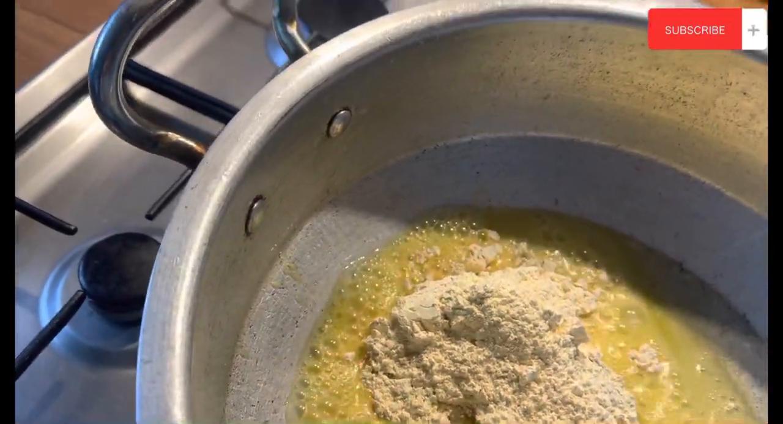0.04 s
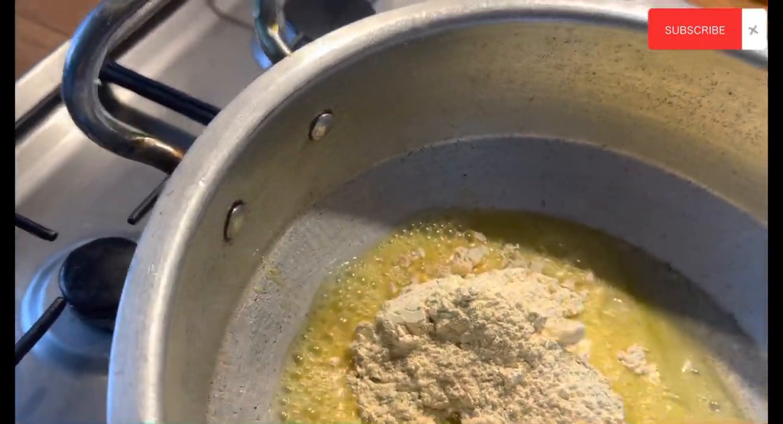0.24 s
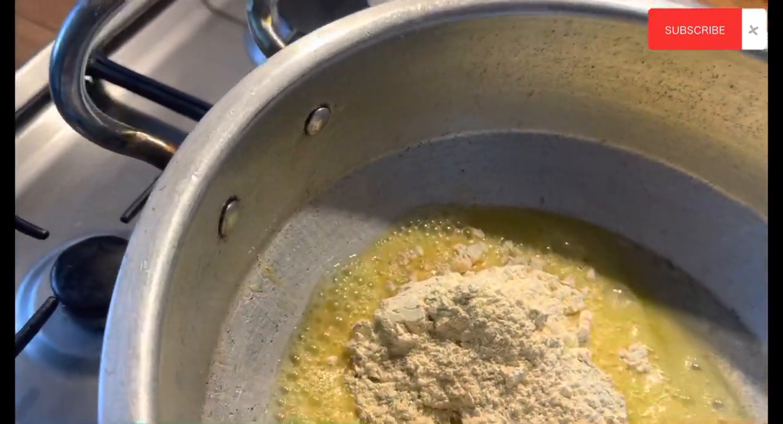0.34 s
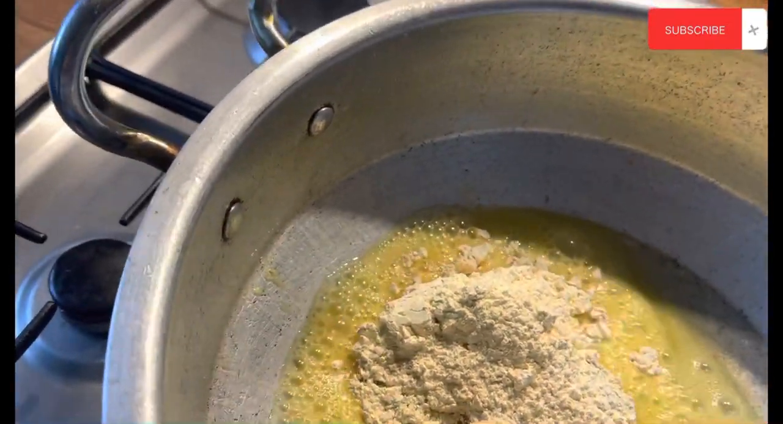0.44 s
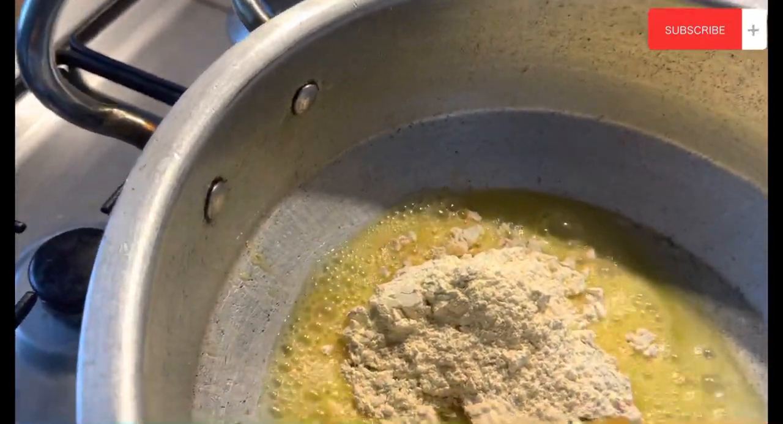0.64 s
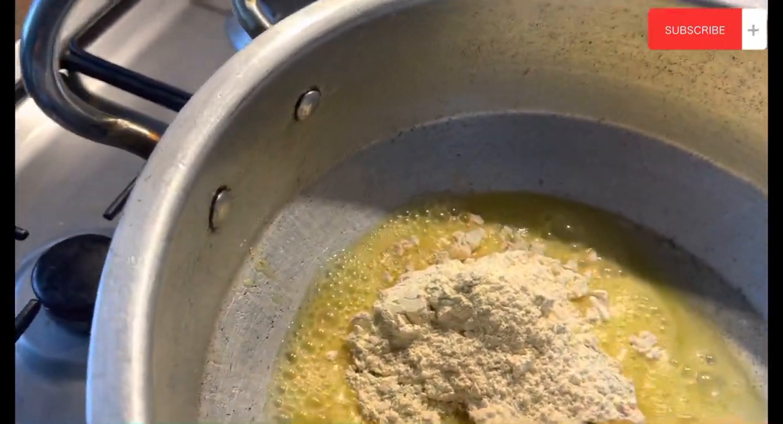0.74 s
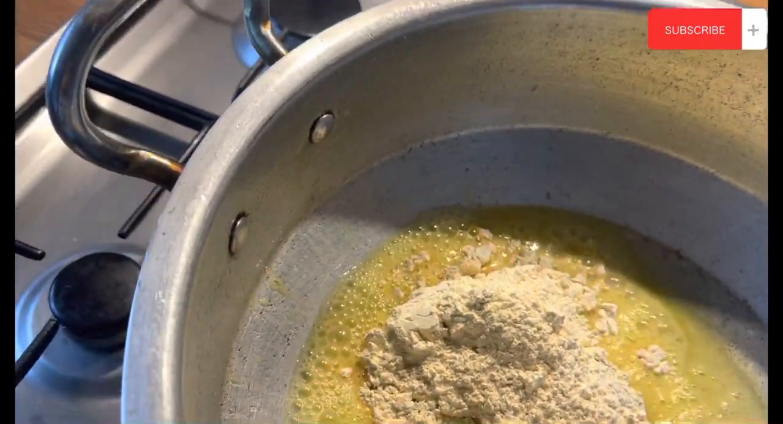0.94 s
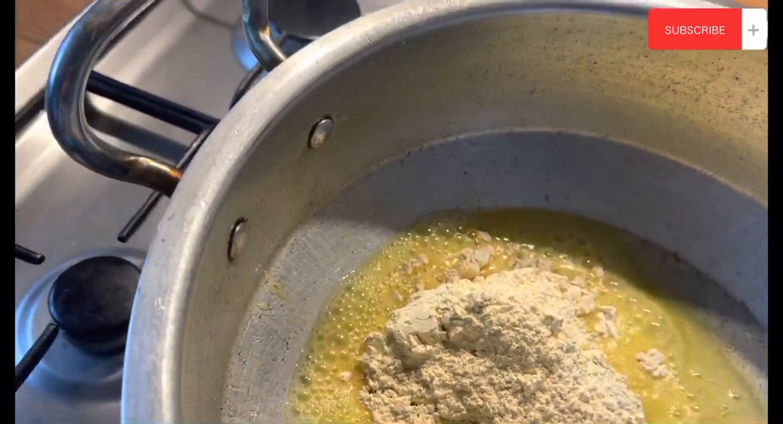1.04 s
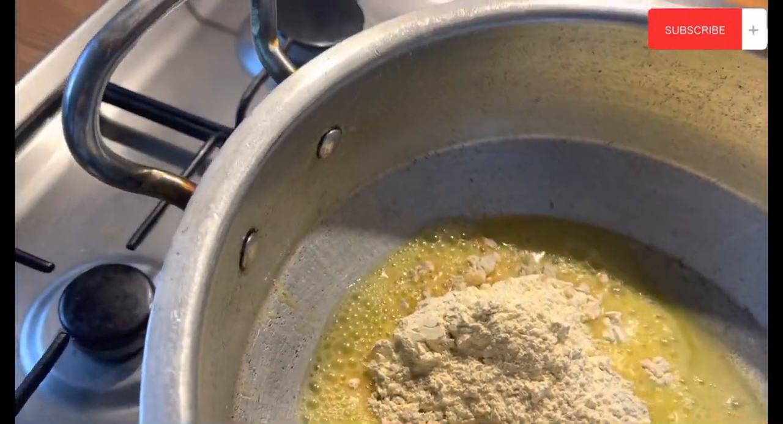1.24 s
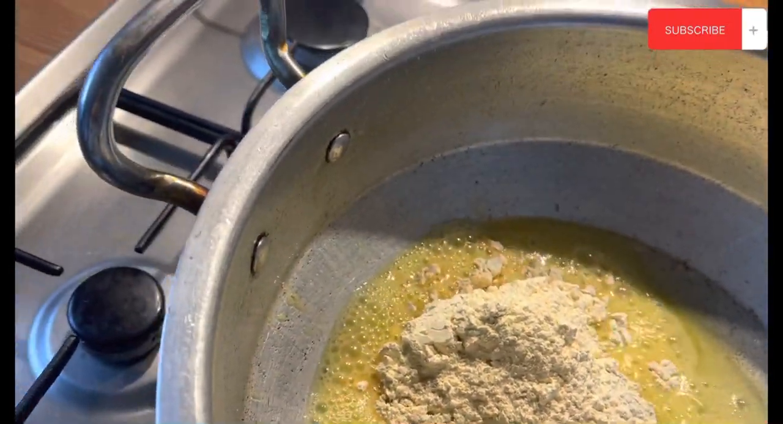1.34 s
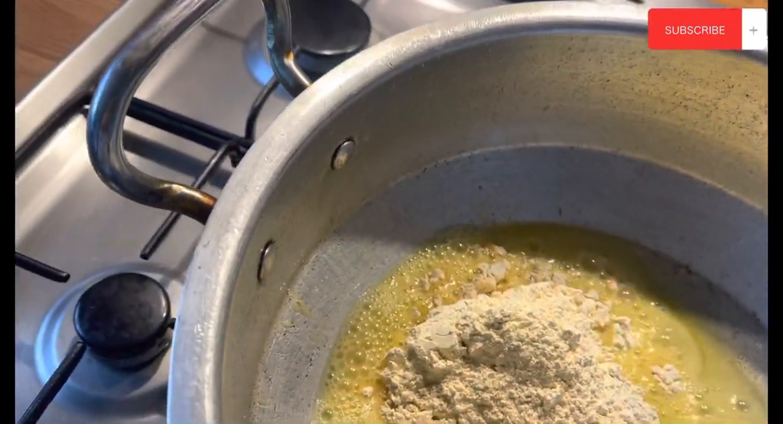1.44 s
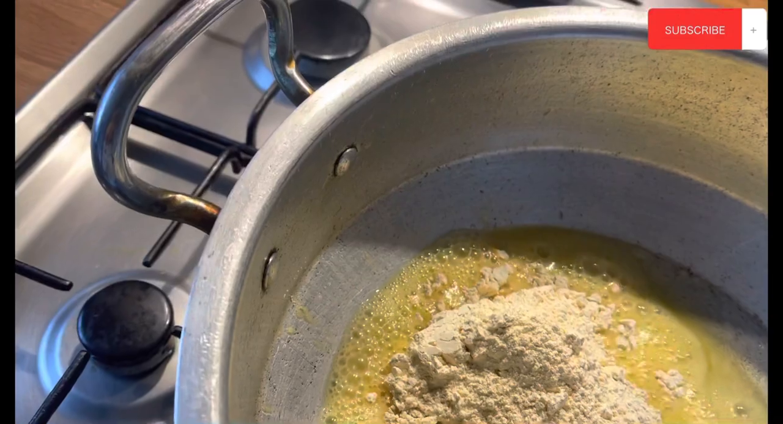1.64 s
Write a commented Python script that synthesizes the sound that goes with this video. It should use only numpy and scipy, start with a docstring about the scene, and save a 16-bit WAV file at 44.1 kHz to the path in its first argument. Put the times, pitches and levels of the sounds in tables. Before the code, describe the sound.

Hot fat sizzles and crackles around flour in a metal pot, with one heavy early knock

```python
"""Ghee sizzles around a heap of flour in a wide metal pot, close to a phone in a small kitchen.
Steam bubbles pop as short decaying tones and ring the pot over a fine fizz of noise bursts; droplets spit.
One sharp, heavy knock lands early, built from body modes, cracks, a crunch and a boom;
two soft bumps of ring and scuff follow farther off, over a low drone of filtered noise."""
import sys
import numpy as np
from scipy import signal
from scipy.fft import rfft, irfft
from scipy.io import wavfile
from scipy.ndimage import uniform_filter1d, minimum_filter1d

SR = 44100
rng = np.random.default_rng(int(sys.argv[2]) if len(sys.argv) > 2 else 0)


def unload_audio(sound):
    """Save the sound as a 16-bit wav file, at the path given as the first command line argument."""
    columns = np.transpose(np.atleast_2d(sound))
    # keep every value between -1 and 1, then stretch to whole-number steps
    steps = np.round(np.clip(columns, -1, 1) * 32767)
    wavfile.write(sys.argv[1], SR, steps.astype(np.int16))


N = 74970

# loud bubble pops: t/s, relative level/dB, f/Hz, decay to 1/e/cycles
POPS = [(.0293,-22.5,2530,1.2),(.0577,-24,2420,1.1),(.0702,-24,2610,1.4),(.1396,-27,2090,.9),(.159,-19.5,3240,0.41),
        (.2696,-20,2600,2),(.3086,-24,2300,1.3),(.3335,-25,2700,0.83),(.3526,-18,2540,1.6),(.3672,-23.5,2270,1.1),
        (.3961,-31,2600,3.9),(.4127,-23,2440,1.6),(.4498,-24.5,2500,0.89),(.495,-22,2420,0.92),(.5062,-25.5,2400,1.2),(.5315,-23.5,2600,1.1),
        (.5679,-23.5,2400,1.3),(.5992,-15.5,2340,1.8),(.6379,-25.5,3700,0.3),(.6992,-21.5,2930,0.93),(.761,-20,2550,1),
        (.8298,-18,2420,1.9),(.8358,-10.5,2650,1.74),(.8487,-21.5,2580,3.5),(.8592,-25.5,2320,0.86),(.8697,-20.5,2830,2.2),(.8807,-34,2700,0.95),
        (.8927,-23,3660,3),(.9177,-22,2660,0.91),(.9367,-24,3200,0.79),(.9534,-22.5,2660,0.57),(.9848,-22,2580,7.4),(.9997,-24,2840,0.71),
        (1.0296,-20.5,2150,1.9),(1.048,-24.5,2780,0.38),(1.0773,-23.5,2620,1.4),(1.1101,-10,2300,2.6),(1.1281,-23,2180,0.66),(1.2034,-20,2380,0.66),
        (1.224,-23,2680,0.89),(1.2342,-24,2700,1.6),(1.2557,-21.5,2430,0.83),(1.3025,-17,2670,1.03),(1.3917,-24,2670,0.97),(1.4056,-28,2350,1.9),
        (1.4586,-17.5,2140,1.9),(1.4808,-16.5,3050,0.97),(1.4916,-15.5,2900,1.16),(1.5061,-30,3070,.9),(1.5283,-24,2700,1.6),(1.5693,-24.5,2770,1.4),
        (1.6149,-16,2800,1.3),(1.6247,-26.5,2400,1.3),(1.678,-24,2360,1.04)]
# tone of every bubble: f/Hz, gain/dB
POP_TONE = [(150,-12.5),(400,11),(800,-3.5),(1250,-0.5),(1800,1.5),(2600,-4),(4300,10),(5200,11.5),(12000,-49)]
# larger blisters collapsing: t/s, level before tone/dB
PLOPS = [(.5992,-31),(0.9183,-30.5),(1.0296,-37),(1.1101,-21.5),(1.4062,-34.5),(1.5063,-32),(1.54,-38),(1.6142,-35.5),(1.654,-36.5)]
# tone of a plop: f/Hz, gain/dB
PLOP_TONE = [(100,-34),(250,-10.5),(400,6.5),(1000,11),(1600,-4),(4000,-73)]
# surges of the sizzle: t/s, gain/dB
SURGE = [(0,3),(.3,1),(.45,1.5),(.58,0.5),(.66,3),(.8,2.5),(.94,3),(1.09,0),(1.2,4),(1.33,0),(1.43,3),(1.5,5),(1.59,0),(1.66,3.5),(1.7,-1)]
# tone of the finest bubbles: f/Hz, gain/dB
FIZZ_TONE = [(300,-8),(900,-2),(1250,-8),(2000,-1.5),(4200,1.5),(5500,3.5),(7200,1.5),(8600,8),(10500,1),(11600,3.5),(12500,-14),(13200,-29),(16000,-31)]
# spitting droplets: t/s, relative level/dB, f/Hz
SPITS = [(.862,-27,9900),(0.869,-28.5,10200),(1.213,-25,8800),(1.2985,-18,11100),(1.348,-25.5,8560)]
# tone of a spit: f/Hz, gain/dB
SPIT_TONE = [(1000,15),(6000,11.5),(8500,9),(11500,8.5),(13000,-14),(16000,-13)]
# resonances of the pot: f/Hz, width/Hz, boost/dB
POT_RESONANCES = [(926,58,9.5),(1630,300,2.5),(1972,98,10),(2596,410,9),(3450,122,4.5),(4260,110,1.5),(4120,610,2.5)]
# body of the knock: f/Hz, relative level/dB, t60/s, rise/s, delay/s
KNOCK_MODES = [(58,-15,.25,.003,.0068),(98.6,6,.085,.006,.0035),(126,-20,.2,.01,.0038),(250,-11,.12,.0033,.0027),(314,5,.018,.0008,.0024),(365,-10,.045,.0006,0),(489,-4,.028,.0012,.0056),(676,-8,.024,.0007,.0008),(705,-25,.2,.004,.004),(1138,-19,.06,.0008,.004)]
# cracks of the contact: t/s, level before tone/dB, decay to 1/e/s
CRACKS = [(.1738,-22,.0025),(.1768,-13,.0018)]
# tone of a crack: f/Hz, gain/dB
CRACK_TONE = [(300,3),(1200,0),(2000,-4),(3000,-2),(4500,-3),(5700,-7),(7500,6),(9300,1),(12000,-14),(14000,-40)]
# tone of the crunch of the contact: f/Hz, gain/dB
CRUNCH_TONE = [(100,2),(400,7),(800,5.5),(1400,7),(2000,-6),(2900,1),(3600,-8.5),(4500,-4),(6000,-12),(11000,-13),(14000,-76)]
# tone of the kitchen's answer to the knock: f/Hz, gain/dB
BOOM_TONE = [(25,-28),(70,-12.5),(125,6.5),(180,-6),(245,2),(330,-10),(460,-5),(600,-16),(800,-15.5),(1300,-24),(2200,-38),(6000,-76)]
# soft bumps: t/s, level/dB, bass/dB, scuff/dB, tilt of the ring/dB per octave
BUMPS = [(.746,-39,-2.5,4,-6.5),(1.187,-27.5,-2,1.5,-1.5)]
# ring of a bump: f/Hz, relative level/dB, t60/s, rise/s
BUMP_MODES = [(155,1,0.21,0.02),(205,-5,0.24,0.03),(276.6,4.5,0.24,0.015),(447,9.5,0.083,0.0066),(845,-14,0.18,0.0062),(1473,3,0.041,0.002)]
# tone of the scuff in a bump: f/Hz, gain/dB
SCUFF_TONE = [(60,-14),(160,6.5),(450,11),(750,5),(1050,3),(1400,2.5),(2200,3),(3500,-4),(6000,-15),(14000,-50)]
# tone of the kitchen's drone: f/Hz, gain/dB
DRONE_TONE = [(20,-32),(45,10),(70,-5.5),(103,15.5),(135,-5.5),(200,-3),(400,-20.5),(800,-32),(2000,-34),(12000,-101)]
# level of the drone: t/s, level/dB
DRONE_LEVEL = [(0,-31.5),(.12,-46.5),(.42,-39),(.55,-49.5),(0.848,-54),(1.1,-54),(1.7,-54)]
# phase by which the left microphone port leads the right: f/Hz, phase/rad
PORT_PHASE = [(0,0),(2000,0),(2400,.6),(5500,1.0),(6700,.3),(7500,.7),(8800,0),(10200,-3.14),(11800,-6.28),(16000,-6.28)]
# left port minus right: f/Hz, level/dB
PORT_BALANCE = [(100,-0.5),(250,-1.5),(700,1.5),(2000,-0.5),(2700,0.9),(4000,3),(5500,2),(7200,2.5),(9000,-0.5),(12000,1)]

# bubbles; the rise is per cycle of decay
POP_DB, POP_RISE_S = 1.5, .0001
WALL_ECHO_S, WALL_ECHO_DB, WALL_ECHO_SPREAD = .001244, -1.5, .13
SIMMER_PER_S, SIMMER_DB, SIMMER_SPREAD_DB = 260, -50.5, 3
SIMMER_HZ, SIMMER_OCTAVES = 2600, .3
SIMMER_CYCLES, SIMMER_RING_OCTAVES = 1.5, 1
PLOP_HZ, PLOP_DECAY_S = 650, .00034
# reflections around the bubbles
SCATTER_DB, SCATTER_T60_S = -9, .0083
KITCHEN_DB, KITCHEN_T60_S, ROOM_RISE_S = -18, .2, .0072
# fizz and spits
FIZZ_PER_S, FIZZ_DB, FIZZ_SPREAD_DB, FIZZ_RING_S = 2400, -44, 1.5, .0006
SPIT_RING_S, SPIT_OCTAVES = .0013, .4
# knock
KNOCK_S, KNOCK_DB, PORT_LAG_S = .1765, -.5, .00038
CRUNCH_S, CRUNCH_DB, CRUNCH_T60_S, CRUNCH_RISE_S = .1722, -12.5, .063, .00072
BOOM_DB, BOOM_T60_S, BOOM_RISE_S = -16.5, .41, .0091
SETTLE_S, SETTLE_HZ, SETTLE_DB, SETTLE_T60_S, SETTLE_RISE_S = .2835, 87, -9.5, .06, .0042
# bumps; the ring is tilted only above BUMP_TILT_HZ
BUMP_TILT_HZ = 280
BUMP_BASS_HZ, BUMP_BASS_T60_S, BUMP_BASS_RISE_S = 96.9, .37, .022
SCUFF_DB, SCUFF_LEAD_S, SCUFF_T60_S, SCUFF_RISE_S = -5, .0038, .32, .0033
# stereo widths, side over mid
FIZZ_WIDTH, BOOM_WIDTH, ROOM_WIDTH = .36, .33, .85
CRACK_WIDTH, CRUNCH_WIDTH, SCUFF_WIDTH, DRONE_WIDTH = .14, 1.0, .35, .069
# phone
LIMITER_S, TOP_HZ = .004, 16000


def amp(db):
    """Amplitude ratio of a level in dB."""
    return 10 ** (np.asarray(db) / 20)


def unit(x):
    """Scale to an RMS of one."""
    return x / np.sqrt(np.mean(x ** 2) + 1e-20)


def since(start):
    """Seconds since a moment, zero before it."""
    return np.maximum(np.arange(N) / SR - start, 0)


def fade(t, t60):
    """Exponential decay by 60 dB in t60 seconds."""
    return np.exp(-np.log(1000) * t / t60)


def gains(points, hz):
    """Gains of a curve of f/Hz and gain/dB, drawn over log frequency."""
    f, db = np.array(points, float).T
    return amp(np.interp(np.log(hz + 1e-9), np.log(f), db))


def colour(x, points):
    """Causal, minimum-phase filter with the response of a tone curve."""
    n = 2 ** 17
    cepstrum = irfft(np.log(gains(points, np.fft.rfftfreq(n, 1 / SR))))
    # folding the cepstrum onto positive time makes the phase minimal
    cepstrum[1:n // 2] *= 2
    cepstrum[n // 2 + 1:] = 0
    return irfft(rfft(x, n) * np.exp(rfft(cepstrum)))[..., :N]


def noise(width):
    """Stereo noise of RMS one; width is side over mid."""
    mid, side = rng.standard_normal((2, N))
    return unit(np.array([mid + width * side, mid - width * side]))


def ring(t, hz, t60, rise):
    """One mode that swells and dies away."""
    return np.sin(2 * np.pi * hz * t) * fade(t, t60) * (1 - np.exp(-(t / rise) ** 2))


def crackle():
    """Loud pops and plops above a simmer of small bubbles, all reflected around pot and kitchen."""
    loud = amp(POP_DB) * bubbles(POPS)
    small = amp(SIMMER_DB) * surge() * unit(bubbles(simmer_rows()))
    return pot(loud + plops() + small)


def simmer_rows():
    """Small bubbles at random moments, scattered in size, pitch and length of ring."""
    count = int(SIMMER_PER_S * N / SR)
    size, pitch, length = np.clip(rng.standard_normal((count, 3)).T, -2, 2)
    starts = rng.uniform(0, N / SR, count)
    hz = SIMMER_HZ * 2 ** (SIMMER_OCTAVES * pitch)
    cycles = SIMMER_CYCLES * 2 ** (SIMMER_RING_OCTAVES * length)
    return np.c_[starts, SIMMER_SPREAD_DB * size, hz, cycles]


def pop(t, hz, cycles):
    """A bubble's tone rises quickly and falls to 1/e in a given number of cycles."""
    rise = 1 - np.exp(-t / (POP_RISE_S * cycles))
    return np.sin(2 * np.pi * hz * t) * np.exp(-t * hz / cycles) * rise


def bubbles(rows):
    """Each bubble snaps or rings for a few cycles and comes back once from the pot's wall."""
    out, t = np.zeros(N + SR), np.arange(SR // 80) / SR
    paths = 1 + WALL_ECHO_SPREAD * (2 * rng.random(len(rows)) - 1)
    for (start, db, hz, cycles), path in zip(rows, paths):
        direct = pop(t, hz, cycles)
        echo = amp(WALL_ECHO_DB) * pop(np.maximum(t - WALL_ECHO_S * path, 0), hz, cycles)
        i = max(int(start * SR), 0)
        # dividing by sqrt(cycles) keeps long rings from gaining energy
        out[i:i + len(t)] += amp(db) / np.sqrt(cycles) * (direct + echo)
    return colour(out[:N], POP_TONE)


def plops():
    """A blister gives way with a single low, heavily damped swing of pressure."""
    swings = np.zeros(N)
    for start, db in PLOPS:
        t = since(start)
        swings += amp(db) * np.sin(2 * np.pi * PLOP_HZ * t) * np.exp(-t / PLOP_DECAY_S)
    return colour(swings, PLOP_TONE)


def room_tail(t60):
    """Dense reflections as stereo noise that builds up and dies away."""
    t = since(0)
    swell = 1 - np.exp(-(t / ROOM_RISE_S) ** 2)
    return unit(noise(ROOM_WIDTH) * fade(t, t60) * swell) / np.sqrt(N)


def pot(x):
    """Sound from the fat scatters in the pot and fills the kitchen."""
    scatter = amp(SCATTER_DB) * room_tail(SCATTER_T60_S)
    kitchen = amp(KITCHEN_DB) * room_tail(KITCHEN_T60_S)
    return x + signal.fftconvolve(x[None], scatter + kitchen, axes=1)[:, :N]


def surge():
    """The boil swells and eases a little."""
    return amp(np.interp(since(0), *np.array(SURGE).T))


def fizz():
    """Countless tiny bursts along the edge of the flour, each a brief hiss."""
    count = int(FIZZ_PER_S * N / SR)
    size_db = FIZZ_SPREAD_DB * np.clip(rng.standard_normal(count), -2, 2)
    power = np.bincount(rng.integers(0, N, count), amp(size_db) ** 2, N)
    # the power of each burst falls to 1/e in FIZZ_RING_S
    decay = np.exp(-1 / (FIZZ_RING_S * SR))
    bursts = np.sqrt(signal.lfilter([1], [1, -decay], power))
    return amp(FIZZ_DB) * unit(colour(bursts * noise(FIZZ_WIDTH), FIZZ_TONE))


def spits():
    """Droplets flash to steam with a short, very bright tick of band-limited noise."""
    out, hz_axis = np.zeros((2, N)), np.fft.rfftfreq(N, 1 / SR) + 1
    for start, db, hz in SPITS:
        t = since(start)
        band = np.exp(-(np.log2(hz_axis / hz) / SPIT_OCTAVES) ** 2 / 2)
        hiss = unit(irfft(rfft(noise(FIZZ_WIDTH)) * band, N))
        out += amp(db) / 2 * hiss * (t > 0) * np.exp(-t / SPIT_RING_S)
    return colour(out, SPIT_TONE)


def hollow(x):
    """The pot's resonances colour everything that sounds inside it."""
    hz = np.geomspace(100, 16000, 800)
    boost = sum(db / (1 + (2 * (hz - centre) / width) ** 2) for centre, width, db in POT_RESONANCES)
    return colour(x, np.c_[hz, boost])


def knock():
    """A hard contact crunches and cracks, a heavy body thuds and settles, and the kitchen booms."""
    # body and boom start later in the left port
    t = np.array([since(KNOCK_S + PORT_LAG_S), since(KNOCK_S)])
    body = np.zeros((2, N))
    for hz, db, t60, rise, delay in KNOCK_MODES:
        body += amp(db) * ring(np.maximum(t - delay, 0), hz, t60, rise)
    contact = np.zeros(N)
    for start, db, decay in CRACKS:
        after = since(start)
        contact += amp(db) * (after > 0) * np.exp(-after / decay)
    crack = colour(contact * noise(CRACK_WIDTH), CRACK_TONE)
    touch = since(CRUNCH_S)
    crunch_shape = fade(touch, CRUNCH_T60_S) * (1 - np.exp(-touch / CRUNCH_RISE_S))
    crunch = unit(colour(noise(CRUNCH_WIDTH), CRUNCH_TONE)) * crunch_shape
    boom_shape = fade(t, BOOM_T60_S) * (1 - np.exp(-t / BOOM_RISE_S))
    boom = unit(colour(noise(BOOM_WIDTH), BOOM_TONE)) * boom_shape
    settle = ring(since(SETTLE_S), SETTLE_HZ, SETTLE_T60_S, SETTLE_RISE_S)
    impact = amp(KNOCK_DB) * body + crack + amp(CRUNCH_DB) * crunch
    return impact + amp(BOOM_DB) * boom + amp(SETTLE_DB) * settle


def bumps():
    """Dull bumps farther off: a scuff of noise, then a hollow ring of modes over a bass tone."""
    out = np.zeros((2, N))
    for start, db, bass_db, scuff_db, tilt_db in BUMPS:
        t, early = since(start), since(start - SCUFF_LEAD_S)
        body = np.zeros(N)
        for hz, mode_db, t60, rise in BUMP_MODES:
            octaves_above = max(np.log2(hz / BUMP_TILT_HZ), 0)
            body += amp(mode_db + tilt_db * octaves_above) * ring(t, hz, t60, rise)
        bass = amp(bass_db) * ring(t, BUMP_BASS_HZ, BUMP_BASS_T60_S, BUMP_BASS_RISE_S)
        scuff_shape = fade(early, SCUFF_T60_S) * (1 - np.exp(-early / SCUFF_RISE_S))
        scuff = unit(colour(noise(SCUFF_WIDTH), SCUFF_TONE)) * scuff_shape
        out += amp(db) * (body + bass + amp(SCUFF_DB + scuff_db) * scuff)
    return out


def drone():
    """Low, wavering background of the kitchen: noise filtered to the bass, following a level curve."""
    level = amp(np.interp(since(0), *np.array(DRONE_LEVEL).T))
    return unit(colour(noise(DRONE_WIDTH), DRONE_TONE)) * level


def scene():
    """The sizzling pot close by, the knock, the bumps farther off and the kitchen's drone."""
    sizzle = hollow(crackle() + surge() * fizz() + spits())
    return sizzle + knock() + bumps() + drone()


def limit(x):
    """A look-ahead limiter turns the sound down wherever it would pass full scale."""
    size = int(LIMITER_S * SR)
    gain = 1 / np.maximum(np.abs(x).max(axis=0), 1)
    return x * uniform_filter1d(minimum_filter1d(gain, size), size)


def record(dry):
    """The phone's two microphone ports differ in phase and level; peaks are limited and the top is cut."""
    hz = np.fft.rfftfreq(2 * N, 1 / SR)
    phase = np.interp(hz, *np.array(PORT_PHASE).T)
    # each port takes half of the difference
    skew = np.sqrt(gains(PORT_BALANCE, hz)) * np.exp(1j * phase / 2)
    ports = irfft(rfft(dry, 2 * N) * np.array([skew, 1 / skew]))[:, :N]
    top_cut = signal.ellip(8, .2, 70, TOP_HZ, fs=SR, output="sos")
    return signal.sosfilt(top_cut, limit(ports))


dry = scene()
out = record(dry)
unload_audio(out)
```